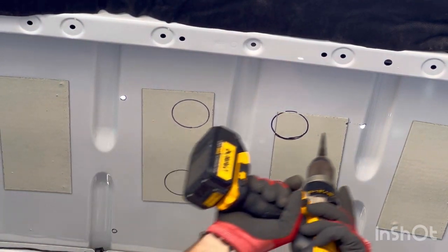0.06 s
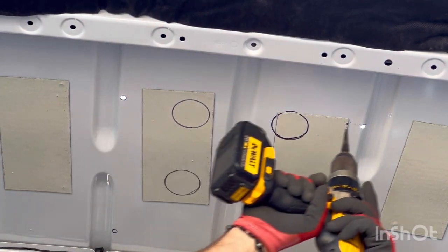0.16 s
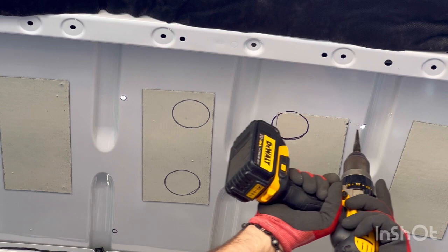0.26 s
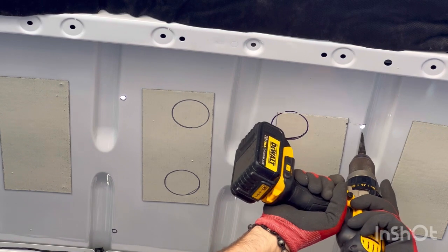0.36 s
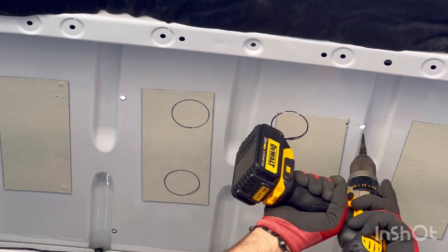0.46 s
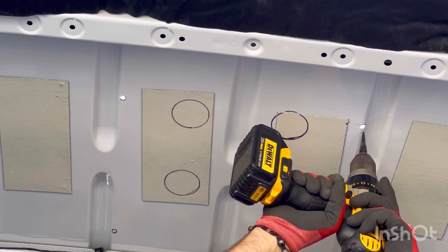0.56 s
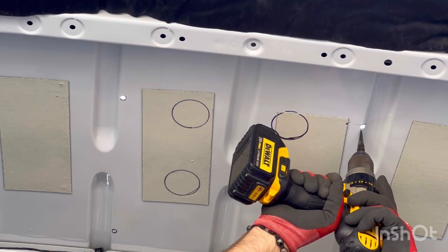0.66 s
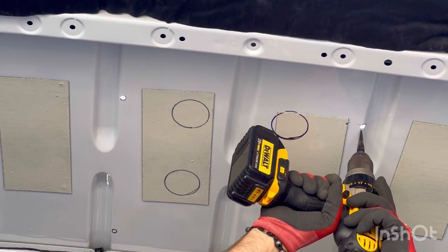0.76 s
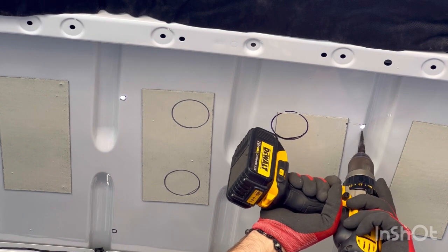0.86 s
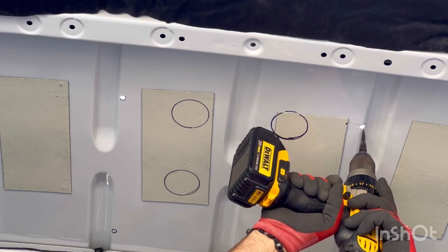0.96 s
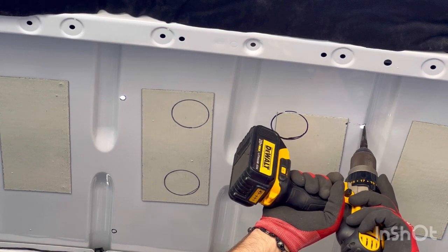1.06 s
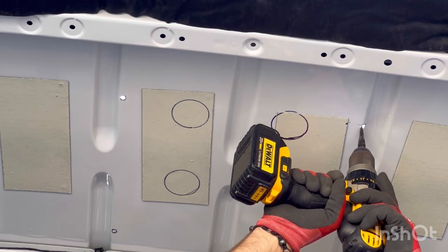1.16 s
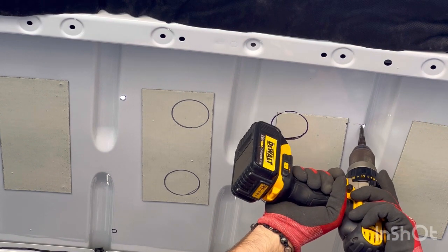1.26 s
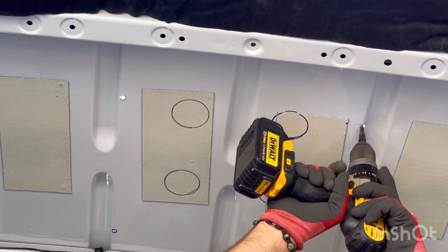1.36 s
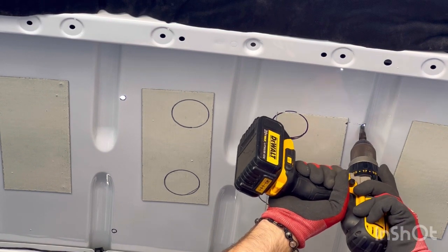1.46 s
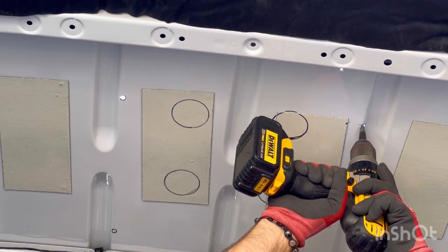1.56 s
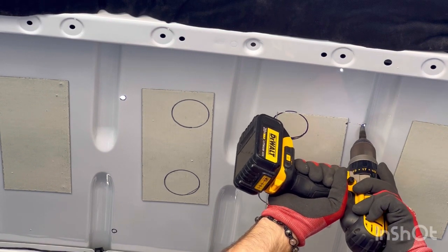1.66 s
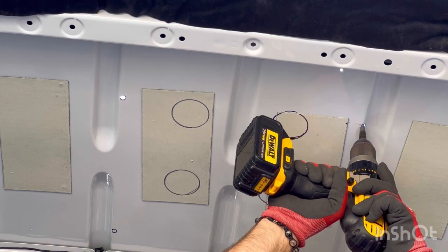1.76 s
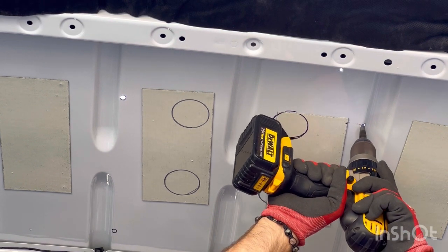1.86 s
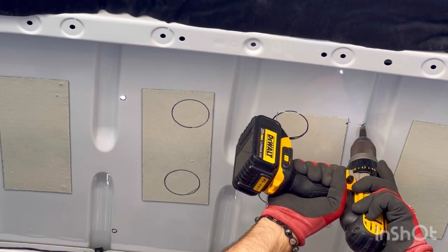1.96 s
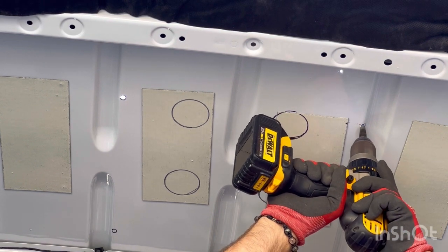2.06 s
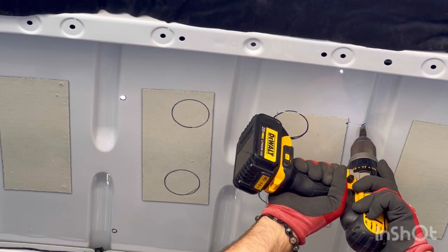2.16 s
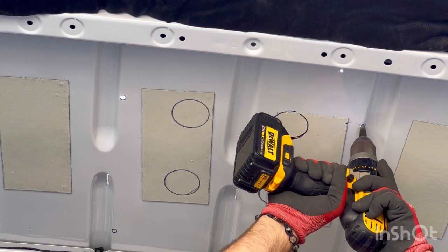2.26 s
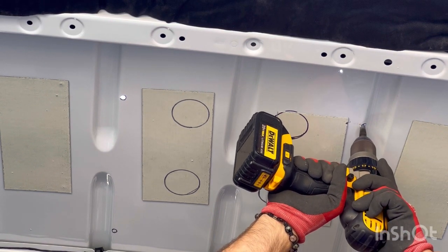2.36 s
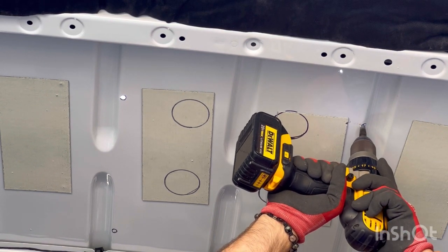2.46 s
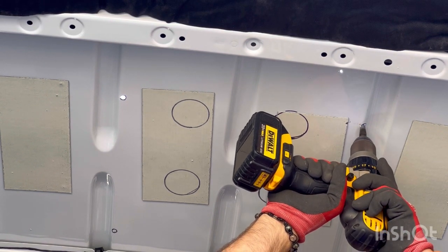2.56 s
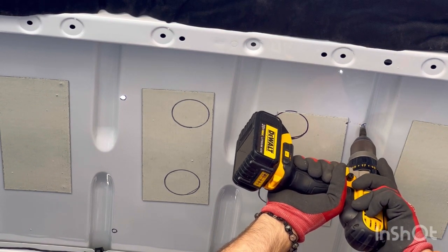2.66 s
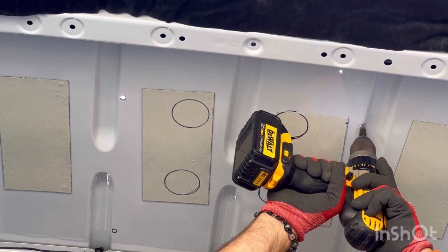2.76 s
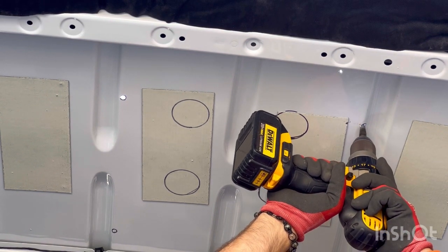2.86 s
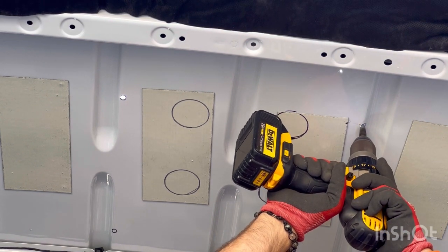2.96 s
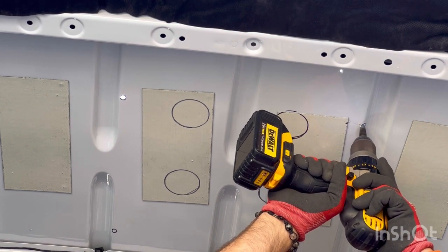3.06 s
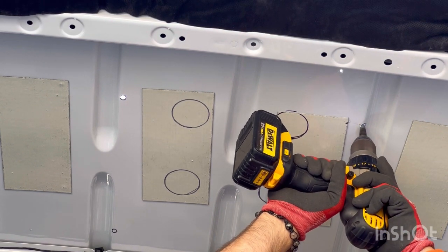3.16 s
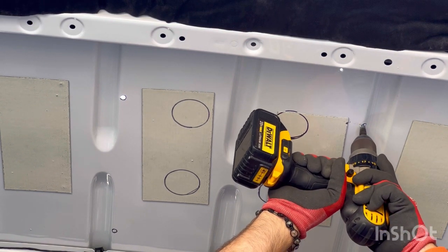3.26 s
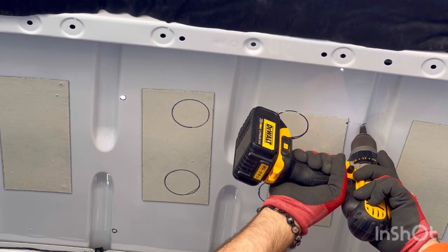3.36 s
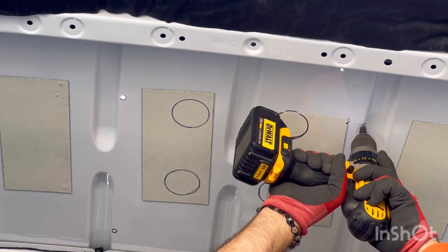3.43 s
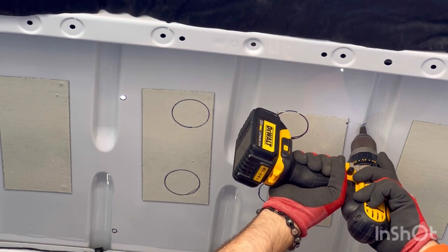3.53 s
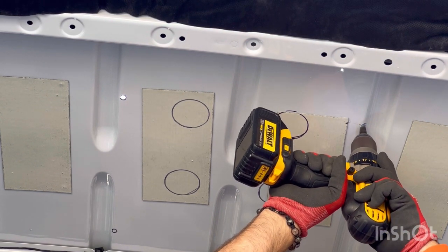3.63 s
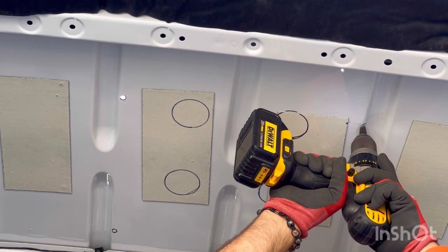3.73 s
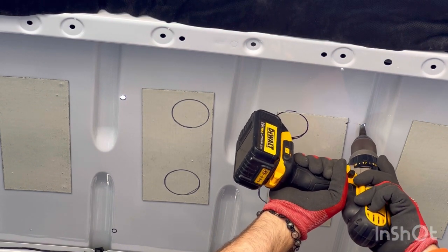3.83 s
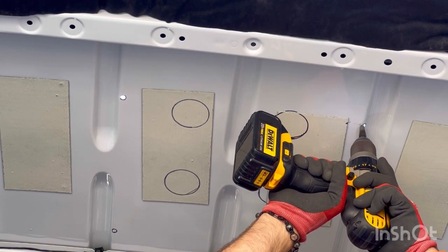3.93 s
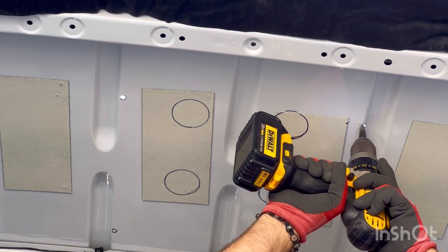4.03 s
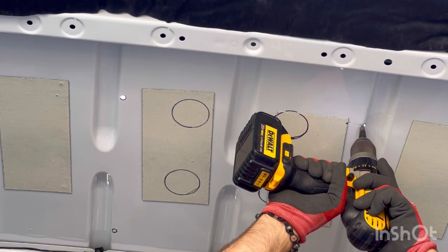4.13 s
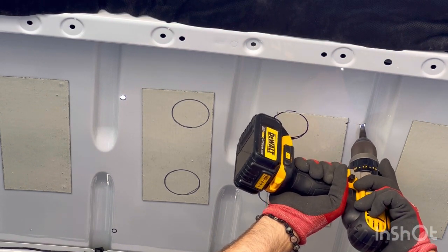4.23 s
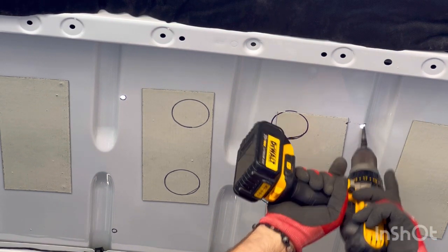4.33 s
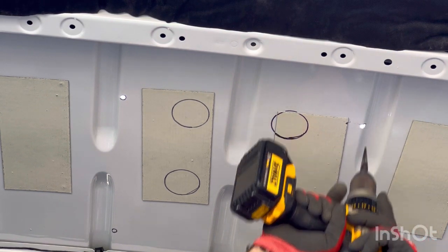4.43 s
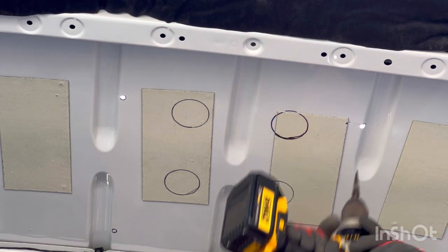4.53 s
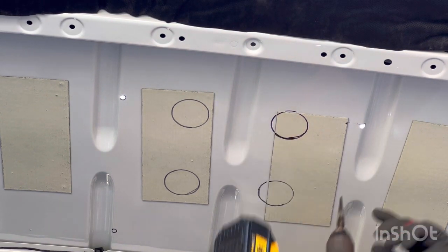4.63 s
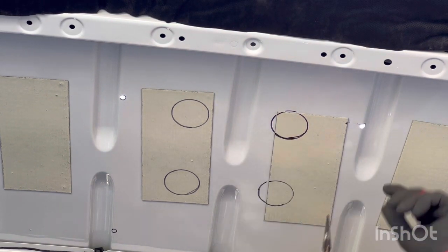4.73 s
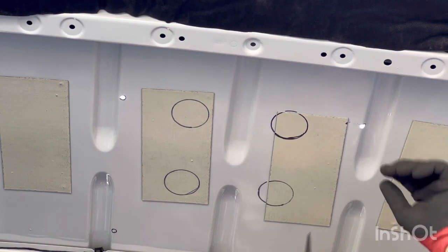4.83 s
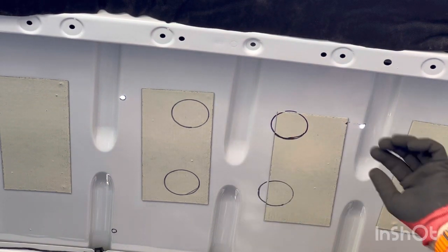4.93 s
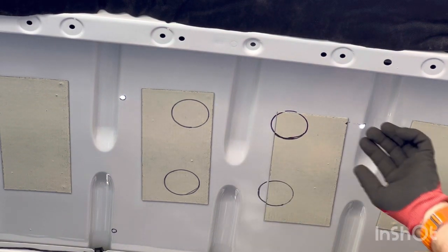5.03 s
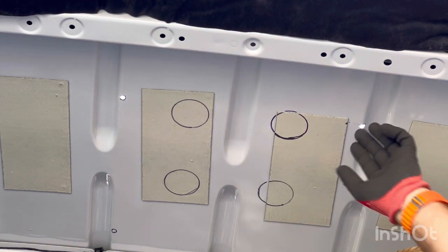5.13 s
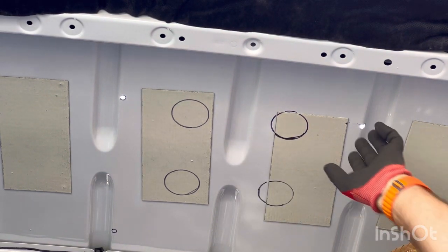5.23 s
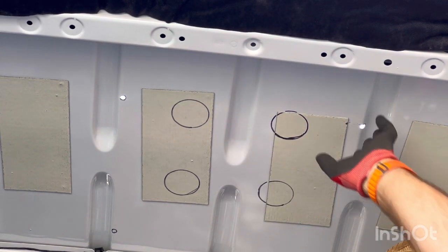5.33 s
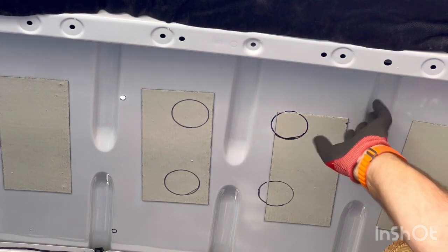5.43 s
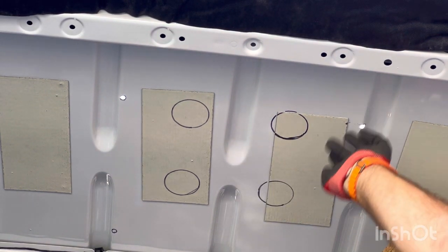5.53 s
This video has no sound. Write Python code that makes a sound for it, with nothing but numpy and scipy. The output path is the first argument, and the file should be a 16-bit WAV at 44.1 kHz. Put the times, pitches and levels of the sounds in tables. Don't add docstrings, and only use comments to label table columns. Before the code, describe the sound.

Close stereo pickup inside a bare steel van. Quiet traffic hum and tiny creaks come first, then light metallic taps as the drill tip finds its spot. A sharp trigger clack starts a high motor whine with gritty gear hiss, rapid panel thumping, grabs and bright chip snaps for nearly three seconds. The brake clacks, the bit stops at once, and fine swarf trickles away as a car passes dully outside.

```python
import sys
import numpy as np
from scipy import signal
from scipy.fft import rfft, irfft, next_fast_len
from scipy.io import wavfile
from scipy.ndimage import uniform_filter1d

SR = 44100
rng = np.random.default_rng(int(sys.argv[2]) if len(sys.argv) > 2 else 0)


def gain_from_db(level_db):
    decades = np.asarray(level_db, float) / 20
    return 10 ** decades


def generate_wav(sig):
    pcm = np.round(np.clip(np.atleast_2d(sig).T, -1, 1) * 32767).astype(np.int16)
    wavfile.write(sys.argv[1], SR, pcm)


N = 246517

# centre in Hz, width in Hz, level in dB.
PANEL = [(255, 47, -2), (322, 70, -3), (403.3, 58, -1), (446, 34, 2), (496.8, 63, -1), (640, 50, -6),
         (680, 56, -8), (892, 210, -14.5)]
# centre in Hz, width in Hz, level in dB.
BOOM = [(116.6, 5.2, -3), (168.6, 16, -1.5), (198.4, 21, 5.5), (223.3, 42.3, 1)]


def level(x, db=0):
    return x * gain_from_db(db) / np.sqrt(np.mean(x ** 2))


def curves(table):
    s, *columns = np.transpose(table)
    return [np.interp(np.arange(N) / SR, s, c) for c in columns]


def band(x, hz, width):
    return signal.lfilter(*signal.iirpeak(hz, hz / width, fs=SR), x)


def ring(x, modes):
    return sum((-1) ** k * gain_from_db(db) * band(x, hz, width) for k, (hz, width, db) in enumerate(modes))


def colour(x, points):
    hz, db = np.transpose(points)
    n = next_fast_len(N)
    f = np.arange(n // 2 + 1) * SR / n + 1
    return irfft(rfft(x, n) * gain_from_db(np.interp(np.log(f), np.log(hz), db)), n)[:N]


def walk(rate):
    k = int(SR / rate)
    steps = np.repeat(rng.standard_normal(N // k + 1), k)
    return level(uniform_filter1d(uniform_filter1d(steps, k), k)[:N])


def burst(hz, t60, spread=.9):
    t = np.arange(SR // 4) / SR
    x = rng.standard_normal(len(t)) * np.exp(-np.log(1000) * t / t60)
    x = band(band(x, hz, spread * hz), hz, spread * hz)
    return x / np.abs(x).max()


def add(out, s, x):
    i = int(s * SR)
    out[i:i + len(x)] += x[:N - i]


def floor_rumble():
    # start in seconds, rumble in dB, time to die away in seconds.
    shoves = [(.01, -48, 0.18), (.43, -47.5, 0.13), (.68, -42.5, 0.39), (1.4, -39, 0.053),
              (1.56, -37, 0.047), (1.9, -35.5, 0.061), (2.08, -31, 0.15), (2.27, -34.5, 0.22),
              (2.68, -46, 0.067), (2.85, -39.5, 0.75), (3.39, -33.5, 0.23), (3.92, -44, .1),
              (4.22, -41.5, 0.14), (4.51, -52, 0.082), (4.95, -57, 0.082), (5.2, -48, .15),
              (5.58, -45.5, .1)]
    t, rise_s = np.arange(N) / SR, .06
    gain = gain_from_db(-56.5)
    for s, db, dies_s in shoves:
        gain = gain + gain_from_db(db) * np.exp(-np.where(t < s, (s - t) / rise_s, (t - s) / dies_s))
    deep = [(22, -40), (34, -28.5), (42, -9), (62, -4.0), (110, -12), (200, -26.5), (800, -79.0)]
    rumble = level(colour(rng.standard_normal(N), deep))
    apart = np.array([[1], [-1]])
    return gain * (rumble + gain_from_db(-29) * np.roll(rumble, SR) * apart)


def passing(s, length, db):
    return gain_from_db(db) / (1 + ((np.arange(N) / SR - s) / length) ** 2)


def traffic():
    # frequency in Hz, level in dB per Hz.
    hum_tilt = [(60, -20.5), (110, -6.5), (190, 1.5), (270, -2), (380, -3), (500, -9.5), (800, -25.5),
                (1500, -47.5), (4000, -73.5)]
    t, apart = np.arange(N) / SR, np.array([[1], [-1]])
    lean_from_s, lean_to_s, lean_rise_s = 1.35, 4.39, 0.079
    lean = (np.tanh((t - lean_from_s) / lean_rise_s) - np.tanh((t - lean_to_s) / lean_rise_s)) / 2
    road = gain_from_db(-50.5) + passing(5.19, 0.36, -42.5) + gain_from_db(-46) * lean
    tyres = gain_from_db(-58.5) + passing(5.03, 0.22, -45) + gain_from_db(-55) * lean
    noise = rng.standard_normal((4, N))
    hum = level(colour(noise[0], hum_tilt)) + level(colour(noise[1], hum_tilt), -8.5) * apart
    wash_tilt = [(480, -25.5), (600, 11.5), (740, 8), (800, -16.5), (900, 1), (1060, -9.5), (1300, -18.5),
                 (2000, -45.5)]
    middle, sides = (level(colour(n, wash_tilt)) for n in noise[2:])
    wash = middle + gain_from_db(2.0) * sides * apart
    return road * hum + gain_from_db(-6.0) * tyres * wash


def far_hiss():
    t = np.arange(N) / SR
    fade_db = -4.5 * (1 + np.tanh((t - 4.55) / .1)) / 2
    hiss_tilt = [(500, -11), (1000, 10.0), (2000, 0.0), (3300, -7), (5000, -23.0), (16000, -41)]
    air_tilt = [(2000, -9.5), (6500, 6.5), (12000, -3.5), (13300, -3), (14000, -39.0)]
    hiss = level(colour(rng.standard_normal(N), hiss_tilt))
    air = level(colour(rng.standard_normal(N), air_tilt), -90)
    return gain_from_db(-70 + 1.5 * walk(4) + fade_db) * hiss + air


def ticks():
    # start in seconds, peak in dB, centre in Hz, width as a share of the centre.
    small_ticks = [(.156, -50, 5980, 0.97), (.156, -60, 2200, .9), (.523, -72, 5000, 1.2),
                   (.565, -61.5, 7040, .6), (.779, -56, 2200, 0.18), (0.778, -57, 3050, 0.1),
                   (.779, -57, 7000, 1.3), (1.16, -47.5, 9040, 1.8), (1.447, -56, 7960, 1.2),
                   (4.46, -58, 4900, 1.2), (4.57, -57, 2300, 1.3), (4.527, -44.5, 3950, 1.6),
                   (4.527, -55, 12070, .8), (4.548, -54, 4460, 1.3), (4.655, -58, 6440, .4),
                   (4.69, -60, 6780, .7), (4.757, -66, 8000, 0.74), (4.775, -63, 3220, 0.57),
                   (4.854, -53, 7850, 0.86), (4.893, -59, 7000, 1.5), (4.921, -54.5, 2500, 0.42),
                   (4.955, -59, 6800, .3), (4.955, -61, 12060, 0.23), (4.985, -63, 6500, .3),
                   (5.02, -64.5, 6470, 0.42), (5.139, -61.5, 6500, 0.84), (5.188, -66, 2600, 0.43),
                   (5.385, -64.5, 2100, .4), (5.44, -57, 2300, .8), (5.452, -46, 7530, 1.83)]
    out = np.zeros(N)
    for s, db, hz, share in small_ticks:
        t60 = 0.069 * (5000 / hz) ** 0.75
        add(out, s, gain_from_db(db) * burst(hz, t60, spread=share))
    return out


def taps():
    # start in seconds, tick peak in dB, tick in Hz, bit scrape in dB, panel thud in dB.
    touches = [
        (0.6583, -51, 2130, -85, -28.5),
        (1.1605, -40.5, 2550, -53, -31.5),
        (1.2428, -46, 2300, -76, -36),
        (1.2583, -57, 1517, -66, -38),
        (1.3092, -43.5, 1980, -71, -33),
        (1.3386, -50, 1750, -57, -41),
        (1.3624, -39.5, 2020, -63, -29.5),
        (1.3856, -49.5, 2230, -66, -37),
        (1.4202, -54.5, 1520, -72, -37),
        (1.4467, -52, 2180, -60.5, -38),
    ]
    out, blows = np.zeros(N), np.zeros(N)
    for s, db, hz, scrape_db, thud_db in touches:
        add(out, s, gain_from_db(db) * burst(hz, 0.13, spread=0.55))
        add(out, s, gain_from_db(scrape_db + 3.5) * burst(4700, 0.16, spread=0.31))
        add(out, s, gain_from_db(scrape_db - 13) * burst(5330, .2, spread=.03))
        add(out, s, gain_from_db(thud_db - 14.5) * burst(1100, 0.26, spread=0.67))
        add(blows, s, gain_from_db(thud_db + 17) * burst(300, 0.018, spread=3.5))
    return out + ring(blows, PANEL) + gain_from_db(1.5) * ring(blows, BOOM)


def switch_and_brake():
    # start in seconds, peak in dB, centre in Hz, decay by 60 dB in seconds.
    clacks = [(1.485, -32, 4000, .3), (1.4986, -8, 1670, 0.058), (1.502, -10.5, 3500, 0.058),
              (1.5126, -6, 3500, 0.05), (1.52, -20.5, 3000, 0.074), (4.3124, -5.5, 4500, 0.063),
              (4.318, -12.5, 3000, 0.089), (4.325, -6, 2300, 0.023), (4.339, -22.5, 2500, 0.09),
              (4.355, -27.5, 3000, 0.13), (4.395, -32.5, 3000, 0.071)]
    out = np.zeros(N)
    for s, db, hz, t60 in clacks:
        add(out, s, gain_from_db(db) * burst(hz, t60, spread=1.8))
        add(out, s, gain_from_db(db - 1.5) * burst(9000, 0.47 * t60, spread=2.4))
    t = np.arange(int(.018 * SR)) / SR
    chirp = gain_from_db(-43.0) * np.sin(2 * np.pi * 3950 * t) + gain_from_db(-52.5) * np.sin(2 * np.pi * 7900 * t)
    add(out, 1.482, chirp)
    return out


def motor():
    # time in seconds, slot rate in Hz, whine at three times the rate in dB, at twice in dB.
    whine_curve = [
        (1.76, 2351, -35.5, -43),
        (2.14, 2332, -32.5, -34),
        (2.33, 2331, -32, -37),
        (2.42, 2318, -31, -41),
        (2.75, 2310, -39.5, -39),
        (3.13, 2316, -34.5, -38.5),
        (3.55, 2311, -42, -43),
        (3.8, 2334, -45, -39.5),
        (4.09, 2358, -38, -39.5),
    ]
    t = np.arange(N) / SR
    hz, *dbs = curves(whine_curve)
    short = np.exp(-np.clip(t - 1.55, -.03, None) / .065)
    stall_s, stall_in_s, stall_out_s = 3.36, .08, .09
    catch = np.exp(-np.where(t < stall_s, (stall_s - t) / stall_in_s, (t - stall_s) / stall_out_s))
    easing = np.clip(t - 4.21, 0, .2) ** 2
    hz = hz - 329.8 * short - 71.34 * catch - 15000 * easing
    return hz, *(db - 17 * short for db in dbs)


def whine(hz, third_db, second_db):
    t = np.arange(N) / SR
    turn = 2 * np.pi * np.cumsum(hz * (1 + .0008 * walk(60))) / SR
    second = gain_from_db(second_db + 0.79 * walk(60)) * np.sin(2 * turn)
    third = gain_from_db(third_db + 2.1 * walk(50)) * np.sin(3 * turn)
    unloaded = np.clip((t - 3.75) / 0.23, .1, 1)
    mesh = gain_from_db(second_db - 2.0 + 1.5 * walk(80)) * unloaded * np.sin(1.93 * turn)
    return np.sqrt(2) * (second + third + mesh)


def gear_hiss(cut_db):
    # frequency in Hz, level in dB per Hz.
    tooth_tilt = [(500, -8.5), (1000, -2.5), (2500, -1), (5000, -3), (7000, -1.5), (9000, -5), (10200, -10),
                  (11600, -8), (13800, -8.5), (16000, -7.5)]
    # centre in Hz, width in Hz, level in dB.
    housing_modes = [(2310, 147, -6.5), (4560, 51, -5.5), (5380, 200, -10), (5700, 67, -3),
                     (9390, 120, -12.5), (11700, 400, -13)]
    teeth = rng.standard_normal(N) * gain_from_db(1.7 * walk(270) + 0.46 * walk(30))
    housing = sum(gain_from_db(db + 2.2 * walk(12)) * band(teeth, hz, width) for hz, width, db in housing_modes)
    gears = level(colour(teeth, tooth_tilt)) + level(housing, -9) * gain_from_db(0.24 * cut_db)
    return gain_from_db(-27 + 0.73 * cut_db) * gears


def feed():
    # time in seconds, push on the panel in dB, depth of cut in dB.
    work = [
        (1.54, -42.5, -33.5),
        (1.8, -38, -30.5),
        (2.05, -36, -30),
        (2.54, -27, -27.5),
        (2.66, -20, -22),
        (2.87, -20.5, -22.5),
        (2.95, -26, -26),
        (3.74, -27, -28),
        (3.765, -38.5, -33),
    ]
    # time in seconds, extra push in dB, extra cut in dB, length in seconds.
    lurches = [(1.718, 9, 3.5, .03), (1.872, 10.5, 1, .04), (1.968, 8.5, 2, .06), (2.152, 5.5, 1, 0.038),
               (2.353, 3.5, 1.5, 0.052), (3.094, 3.5, 4, .06), (3.262, 0.5, -1, 0.034),
               (3.34, 1, 1.5, 0.021), (3.497, 0.5, 0.5, .07), (3.636, -0.5, 1, 0.027),
               (3.712, 1.5, 2.5, .04), (3.821, 6.5, -0.5, 0.013), (4.104, -0.5, 2, .1),
               (4.196, 8.5, 1, 0.039), (4.235, -4.5, -4.5, .03)]
    t = np.arange(N) / SR
    push_db, cut_db = curves(work)
    _, usual_push_db, usual_cut_db = np.mean(work, axis=0)
    for s, more_push_db, more_cut_db, length in lurches:
        lurch = np.exp(-((t - s) / length) ** 2)
        push_db = push_db + more_push_db * lurch
        cut_db = cut_db + more_cut_db * lurch
    return push_db, push_db - usual_push_db, cut_db - usual_cut_db


def flutes(hz, push_db, push_swing_db, cut_db):
    # centre in Hz, width in Hz, level in dB.
    crunch = [(1063, 130, -5.5), (1480, 180, -0.5), (2300, 640, 0.5), (2900, 690, 2.5), (4000, 700, -0.5),
              (5460, 1240, -3)]
    slots_per_flute = 40.5
    flute = np.cumsum(hz / slots_per_flute * (1 + .025 * walk(30))) / SR
    bite = np.floor(flute).astype(int)
    thump_chance, tear_chance = rng.standard_normal((bite[-1] + 1, 2))[bite].T
    size = gain_from_db(1.7 * thump_chance - 1.4 * (bite % 2))
    push = uniform_filter1d(np.diff(bite, prepend=0) * size, size=24)
    chatter = rng.standard_normal(N) * (rng.random(N) < 200 / SR)
    panel = level(ring(push, PANEL)) + level(ring(chatter, PANEL) * gain_from_db(2.6 * walk(24.98)), 0.56)
    boom = level(ring(push, BOOM)) + level(ring(chatter, BOOM), 1.2)
    tearing = 0.57 + gain_from_db(1.37 * tear_chance + 3.7 * (bite % 2)) * np.exp(-(flute % 1) / .3)
    tearing = tearing + 0.69 * level(signal.lfilter([1], [1, -np.exp(-1 / (0.0018 * SR))], np.abs(chatter)))
    chips = level(ring(rng.standard_normal(N) * tearing * gain_from_db(1.4 * walk(400)), crunch))
    thumps = gain_from_db(push_db - 3.0) * panel + gain_from_db(-37 + 0.82 * push_swing_db) * boom
    return thumps + gain_from_db(-31 + 1.2 * cut_db) * chips


def drill():
    t = np.arange(N) / SR
    hz, third_db, second_db = motor()
    push_db, push_swing_db, cut_db = feed()
    running = np.clip((t - 1.5) / .02, 0, 1) * np.clip((4.36 - t) / 0.038, 0, 1)
    spinning = np.clip((t - 1.53) / 0.021, 0, 1) * np.clip((4.32 - t) / .01, 0, 1)
    body = gear_hiss(cut_db) + flutes(hz, push_db, push_swing_db, cut_db)
    return running * body + spinning * whine(hz, third_db, second_db)


def low_snaps():
    # start in seconds, peak in dB, centre in Hz.
    low_chip_snaps = [(1.718, -16.5, 2860), (2.012, -17, 2620), (2.4138, -21, 2310), (2.4934, -14.5, 3400),
                      (2.5976, -28, 2350), (2.6516, -16, 2230), (2.7195, -19.5, 2340), (2.773, -13.5, 2930),
                      (2.8603, -14, 3030), (3.0304, -15.5, 2290), (3.319, -19, 2310), (3.4189, -11, 2950),
                      (3.4541, -11, 3050), (3.5262, -12.5, 2830)]
    out = np.zeros(N)
    for s, db, hz in low_chip_snaps:
        add(out, s, gain_from_db(db - 2) * burst(hz, 0.087, spread=0.6))
    return out


def snaps():
    # start in seconds, peak in dB, centre in Hz.
    chip_snaps = [(1.818, -15, 6860), (2.151, -14.5, 6700), (2.3053, -10, 4650), (2.3404, -8, 6860),
                  (2.513, -11, 6480), (2.5981, -18, 6958), (2.6522, -13, 6934), (2.827, -18, 5340),
                  (2.858, -24, 5430), (2.8954, -26, 5870), (3.3, -21.5, 4560), (3.3499, -8.5, 5460),
                  (3.527, -10, 4420), (3.6282, -11, 5400), (3.6972, -9, 5400), (3.8018, -12, 4812)]
    out = np.zeros(N)
    for s, db, hz in chip_snaps:
        add(out, s, gain_from_db(db - 3) * burst(hz, 0.072, spread=0.72))
    return out


def swarf():
    after = np.arange(N) / SR - 4.4
    grains = rng.standard_normal(N) * gain_from_db(1.6 * walk(300))
    trickle = level(band(band(grains, 2800, 5000), 3000, 6500), -63.5)
    return trickle * (after > 0) * np.exp(-np.log(1000) * np.abs(after) / 1.28)


def van(x):
    t, t60_s = np.arange(SR // 3) / SR, 0.15
    tail = rng.standard_normal((2, len(t))) * np.exp(-np.log(1000) * t / t60_s) * (t > .003)
    tail = tail / np.sqrt(np.sum(tail ** 2, axis=1, keepdims=True))
    mid, side = (signal.fftconvolve(x, h)[:N] for h in tail)
    mid = colour(mid, [(300, -2.0), (900, -1.5), (16000, -7.0)])
    side = colour(side, [(60, -5.0), (250, -3.0), (600, 7.0), (1400, 5.0), (2050, -8.5), (2900, 5.5),
                         (4600, 3.0), (6000, -21.5), (16000, -28.0)])
    return x + gain_from_db(-6.5) * mid + gain_from_db(-13.0) * side * np.array([[1], [-1]])


def scene():
    outside = floor_rumble() + traffic() + far_hiss()
    inside = ticks() + taps() + switch_and_brake() + drill() + low_snaps() + snaps() + swarf()
    return van(inside) + outside


def band_limit(x):
    return signal.sosfilt(signal.butter(12, 16980, fs=SR, output="sos"), x)


def record(dry):
    edge = 4096
    dry = np.pad(dry, ((0, 0), (edge, edge)), mode="reflect")
    at, n = np.arange(N + 2 * edge), next_fast_len(N + 2 * edge)
    dry = dry * np.clip(np.minimum(at, at[::-1]) / edge, 0, 1)
    f = np.arange(n // 2 + 1) * SR / n
    slip_from_hz, lag_s, top_hz = 8250, 0.000264, 15760
    slip = np.pi * lag_s * np.clip(f - slip_from_hz, 0, None)
    turned = rfft(dry, n) * np.exp(1j * np.array([-slip, slip]))
    lowpass = np.clip((top_hz - f) / 60 + .5, 0, 1)
    ports = irfft(turned * lowpass, n)[:, edge:edge + N]
    return band_limit(ports)


dry = scene()
out = record(dry)
generate_wav(out)
```